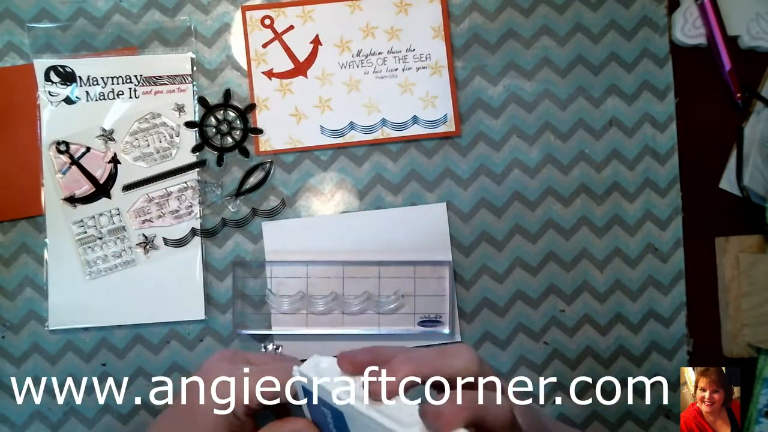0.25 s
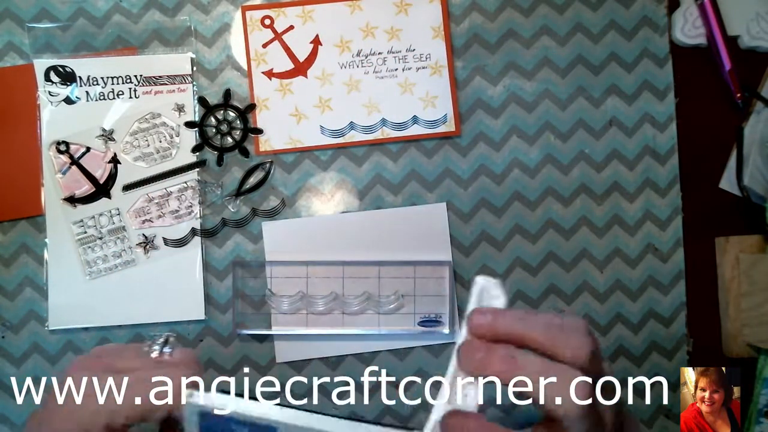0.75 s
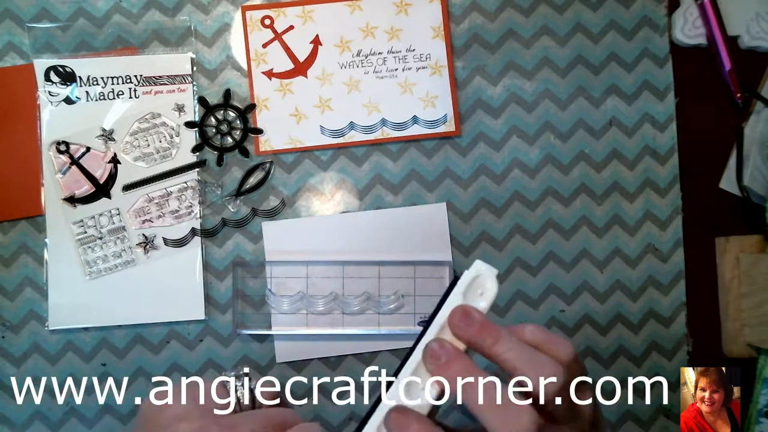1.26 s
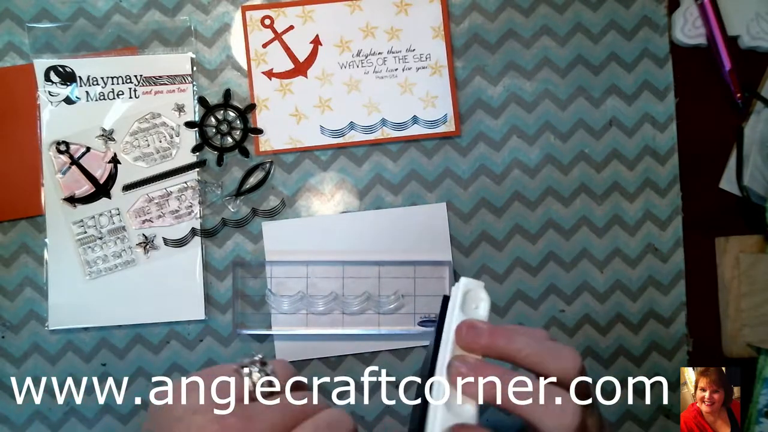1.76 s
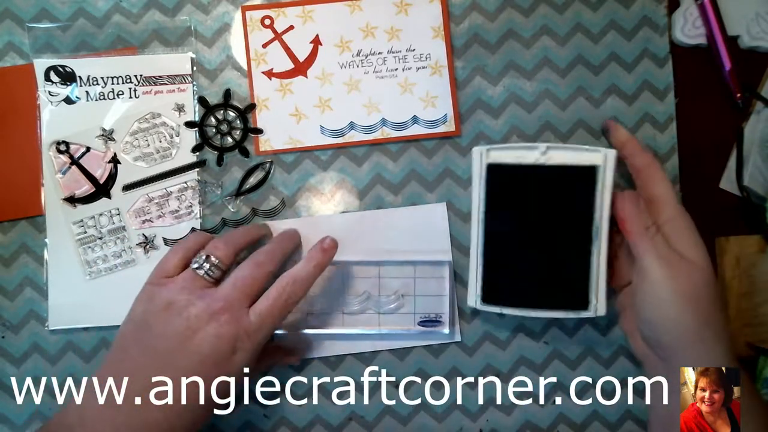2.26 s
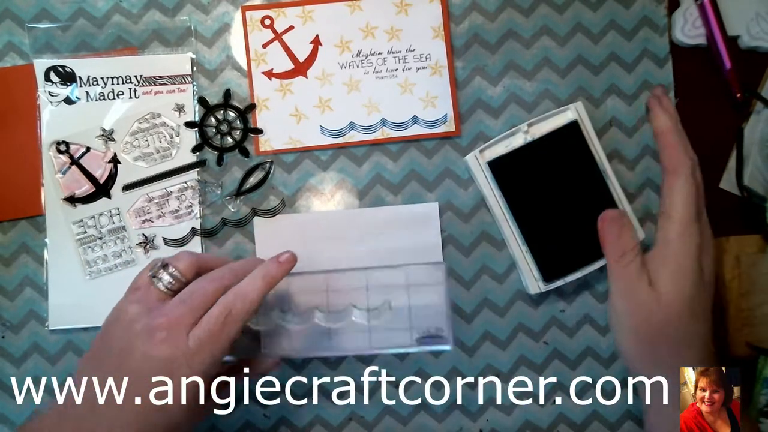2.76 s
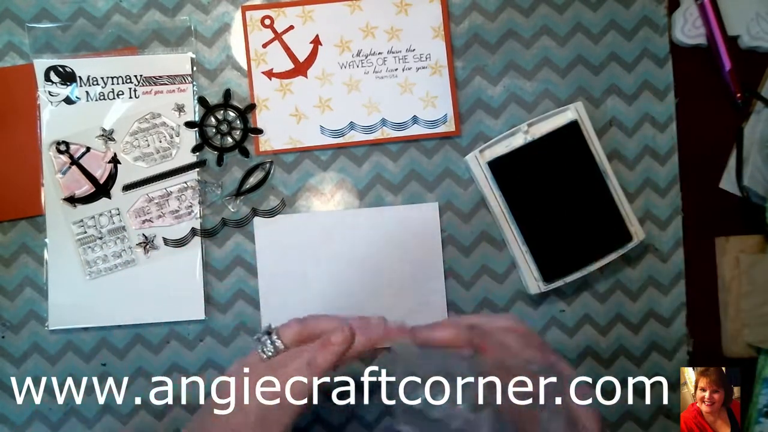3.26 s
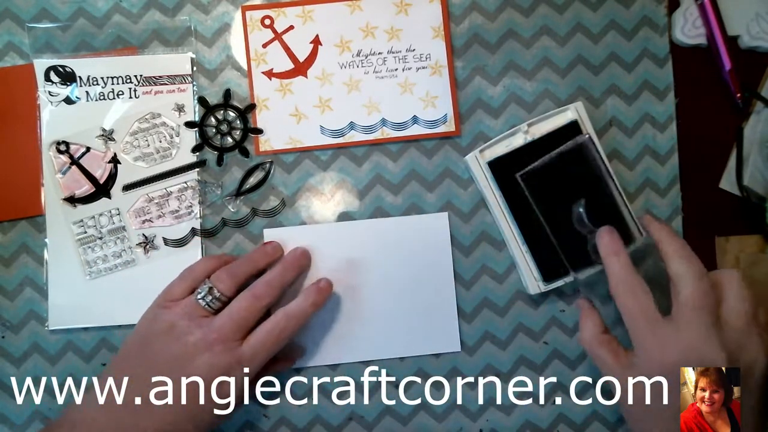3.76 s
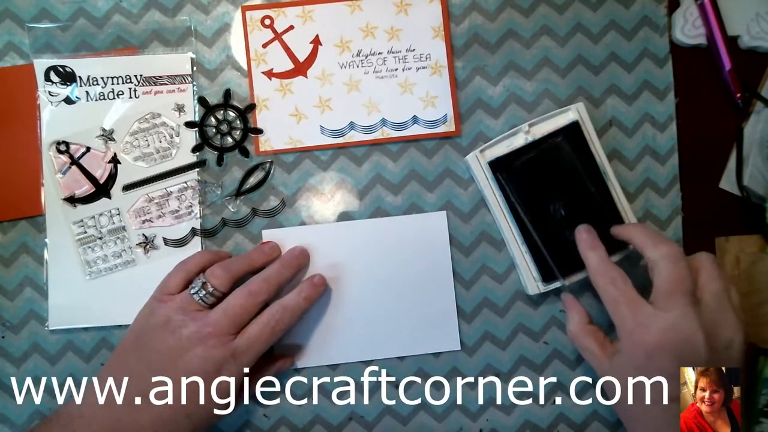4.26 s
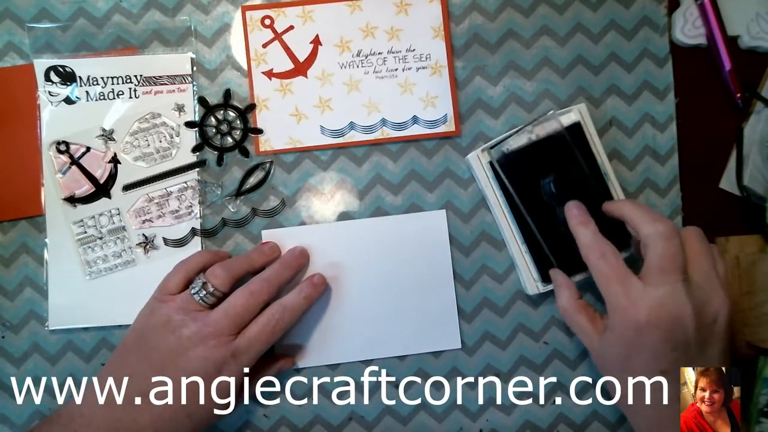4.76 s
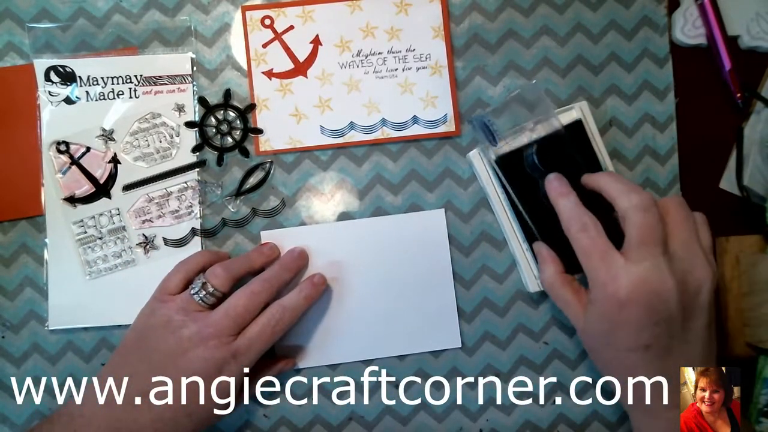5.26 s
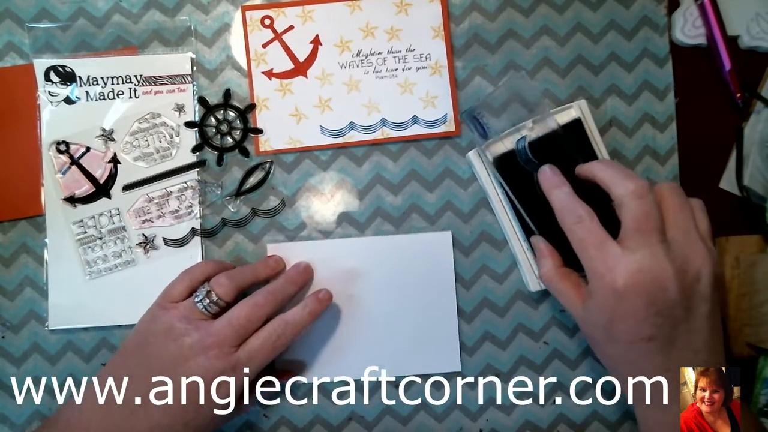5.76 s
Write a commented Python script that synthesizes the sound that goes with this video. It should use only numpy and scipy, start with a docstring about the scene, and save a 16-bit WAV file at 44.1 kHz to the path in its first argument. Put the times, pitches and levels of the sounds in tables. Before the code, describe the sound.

Close, dry desktop sounds over quiet fan-like hum: faint clicks and fingertip scuffs, a short plastic slide into a stop, then a bright sharp lid snap. Knocks follow as the hollow case is set down, ending in the loudest crack and a rapid bounce. After a quieter gap with tiny squeaks, a stamp block taps the pad's rim lightly, with soft squashes and low hand bumps.

```python
"""Over a faint wavering hum, fingers flick at a hard plastic ink pad case and its lid slides and snaps round.
The case then clatters down on a desk and bounces to rest; fingers brush and squeak on it.
Last, a stamp on an acrylic block is dabbed on the pad and clicks against the rim.
Knocks are fading tones plus cracks of noise; rubbing is filtered noise; soft bumps are low tones.
A small, dry room adds short echoes, and one nearby microphone hears it all."""
import sys
import numpy as np
from scipy import signal
from scipy.fft import rfft, irfft, next_fast_len
from scipy.io import wavfile
from scipy.ndimage import uniform_filter1d

SR = 44100
rng = np.random.default_rng(int(sys.argv[2]) if len(sys.argv) > 2 else 0)


def wav_out(sig):
    """Save sig, one row per channel (or a flat mono array), as 16-bit PCM at SR to the path in sys.argv[1]."""
    wavfile.write(sys.argv[1], SR, np.round(np.clip(np.atleast_2d(sig).T, -1, 1) * 32767).astype(np.int16))


N = 265437  # length of the scene in samples
T = np.arange(N) / SR  # time in the scene, seconds
AGE = T[:SR // 3]  # time since a short sound began, seconds


def amp(db):
    """Turn decibels into a gain."""
    return 10 ** (np.asarray(db) / 20)


def unit(x):
    """Scale to rms 1."""
    return x / np.sqrt(np.mean(x ** 2))


def burst(x):
    """Scale a short sound to the energy of 5 ms at rms 1."""
    return x / np.sqrt(np.sum(x ** 2) / (.005 * SR))


def add(track, start_s, sound):
    """Mix a sound into the track at its start time."""
    i = max(int(start_s * SR), 0)
    track[i:i + len(sound)] += sound[:N - i]


def lowpass(x, hz):
    """Take away the treble above a cut-off (second order)."""
    sos = signal.butter(2, min(hz, SR / 2 - 1000), fs=SR, output="sos")
    return signal.sosfilt(sos, x)


def highpass(x, hz, order):
    """Take away the bass below a cut-off."""
    return signal.sosfilt(signal.butter(order, hz, "high", fs=SR, output="sos"), x)


def colour(x, points):
    """Shape the tone through (pitch_hz, level_db) points, with no sound ahead of its cause."""
    size = next_fast_len(len(x) + 2048, True)
    hz, db = np.transpose(points)
    log_hz = np.log(np.fft.rfftfreq(size, 1 / SR) + 1)
    log_gain = np.log(amp(np.interp(log_hz, np.log(hz), db)))
    # folding the cepstrum forward in time makes the filter causal
    cepstrum = irfft(log_gain, size)
    cepstrum[1:size // 2] *= 2
    cepstrum[size // 2 + 1:] = 0
    response = np.exp(rfft(cepstrum))
    return irfft(rfft(x, size) * response, size)[:len(x)]


def fade(t60):
    """Die away smoothly, by 60 dB in t60 seconds."""
    return np.exp(-np.log(1000) * AGE / t60)


def swell(length_s):
    """A soft push that peaks at 1 after half its length and dies away."""
    u = 2 * AGE / length_s
    return u * np.exp(1 - u)


def walk(rate_hz):
    """Slow chance with spread 1: held random levels, smoothed twice."""
    k = int(SR / rate_hz)
    held = np.repeat(rng.standard_normal(N // k + 1), k)
    return unit(uniform_filter1d(uniform_filter1d(held, k), k)[:N])


# tone of the echoes: pitch_hz, level_db
ECHO_COLOUR = [(100, -4), (400, -3.5), (1000, -5), (2700, -8.5), (6000, -7), (10000, -4.5), (15000, -3)]


def room(x, wet_db, low_t60=0.13, high_t60=0.074, split_hz=4500, build_s=.02):
    """Echoes from the desk and near walls build up in milliseconds; the treble dies first."""
    noise = rng.standard_normal(len(AGE))
    low = signal.sosfiltfilt(signal.butter(2, split_hz, fs=SR, output="sos"), noise)
    high = noise - low
    tail = (low * fade(low_t60) + high * fade(high_t60)) * (1 - fade(build_s)) ** 2
    tail = colour(tail / np.sqrt(np.sum(tail ** 2)), ECHO_COLOUR)
    return x + amp(wet_db) * signal.fftconvolve(x, tail)[:len(x)]


# tones of the hum: pitch_hz, level_db (rms)
HUM_TONES = [(108.3, -56), (303, -68), (409, -71.5), (486, -72), (612, -71)]
# tone of the room air: pitch_hz, level_db
AIR_COLOUR = [(20, -14), (40, -10.5), (60, -13), (80, -15), (100, -6), (145, -1), (190, -6.5), (300, -10.5),
              (400, -14.5), (620, -10.5), (950, -14), (1600, -24.5), (5000, -39), (16000, -52.5)]
AIR_DB = -56.5


def background(waver_hz=1.7, flutter_db=1.5, drift_db=.5):
    """A hum, as of a small fan, wavers in pitch and level over the noise of the room air."""
    hum = np.zeros(N)
    for pitch_hz, level_db in HUM_TONES:
        level = amp(level_db + flutter_db * walk(15))
        phase = 2 * np.pi * np.cumsum(pitch_hz + waver_hz * walk(10)) / SR
        hum += level * np.sqrt(2) * np.sin(phase)
    air = unit(colour(rng.standard_normal(N), AIR_COLOUR))
    return hum + amp(AIR_DB + drift_db * walk(1.3)) * air


# soft bumps on the desk, mostly from hands; the last follows the stamp's tap at 5.765 s: start_s, level_db,
# pitch_hz
DESK_BUMPS = [(1.262, -53, 305), (1.523, -52.5, 135), (3.625, -57, 272), (3.805, -55.5, 135),
              (4.675, -54.5, 159.6), (3.96, -50, 120.9), (5.782, -51, 291.8)]
BUMP_S = .021


def desk_bumps():
    """A soft push on the desk is heard as one low tone that swells and dies."""
    out = np.zeros(N)
    for start_s, level_db, pitch_hz in DESK_BUMPS:
        tone = np.sqrt(2) * np.sin(2 * np.pi * pitch_hz * AGE)
        add(out, start_s, amp(level_db) * tone * swell(BUMP_S))
    return out


def rubs(events, resonances):
    """Short swells of friction noise pass through the resonances of what is rubbed."""
    out = np.zeros(N)
    for start_s, level_db, length_s in events:
        for pitch_hz, width_hz, share_db in resonances:
            b, a = signal.iirpeak(pitch_hz, pitch_hz / width_hz, fs=SR)
            noise = rng.standard_normal(len(AGE))
            grit = signal.lfilter(b, a, signal.lfilter(b, a, noise))
            add(out, start_s, amp(level_db + share_db) * unit(grit) * swell(length_s))
    return out


# fingertips flick and brush over the case: start_s, level_db, length_s
FINGER_RUBS = [(.615, -72, .007), (.634, -65.5, .005), (.704, -71, .01), (.777, -70, .007),
               (1.25, -70.5, .007), (1.609, -67.5, .008), (1.96, -78.5, .06), (3.261, -80, .014)]
# resonances of rubbing skin: pitch_hz, width_hz, level_db
SKIN_RESONANCES = [(9070, 6300, -0.5), (2435, 2400, -5.5)]


def skin_rubs():
    """Fingertips scuff the case with a wide, mostly high rush of noise."""
    return rubs(FINGER_RUBS, SKIN_RESONANCES)


# fingers squeak on plastic: start_s, level_db, length_s
FINGER_SQUEAKS = [(2.355, -69, .03), (2.42, -61.5, 0.024), (3.309, -63.5, 0.016), (3.342, -59.5, 0.00574)]
# resonances of a squeak: pitch_hz, width_hz, level_db
SQUEAK_RESONANCES = [(3100, 510, -0.5), (1350, 400, -2.5)]


def squeaks():
    """Fingers squeak on plastic: friction noise gathers in two narrower bands."""
    return rubs(FINGER_SQUEAKS, SQUEAK_RESONANCES)


# the stamp squashes the pad: start_s, level_db, length_s
STAMP_PRESSES = [(4.143, -41.5, .011), (4.243, -46.5, .012), (4.618, -49, .022), (4.683, -46, .014),
                 (4.762, -50, .016)]
# resonances of the squashed pad: pitch_hz, width_hz, level_db
PAD_RESONANCES = [(707, 230, -1), (1200, 900, -13)]


def pad_presses():
    """The soft pad gives way under the stamp with a short, dull swell of noise."""
    return rubs(STAMP_PRESSES, PAD_RESONANCES)


SLIDE_EDGE_S = .008  # how long the slide takes to start, break free or stop


def onset(start_s):
    """Rise from 0 to 1 around a moment."""
    return np.clip((T - start_s) / SLIDE_EDGE_S + .5, 0, 1)


# tone of the lid on its rails: pitch_hz, level_db
RAIL_COLOUR = [(290, -58), (500, -48), (807, -34.5), (855, -14), (1180, 0), (1640, -14), (3920, -1.5),
               (4340, -12), (5020, -3), (6230, -18.5), (7100, -12.5), (11000, -18.5), (16000, -30)]
# the lid creeps along its rails, breaks free and speeds up until it meets the stop
CREEP_S, FREE_S, STOP_S = .778, .827, .908
CREEP_DB, FREE_DB, SPEED_UP_DB_PER_S = -66.5, -51, 25.5


def slide(slips_per_s=2500, catches_per_s=130, hiss=0.97):
    """Plastic rubs on plastic: dense slips over a fine hiss, with a few coarser catches."""
    slips = (rng.random(N) < slips_per_s / SR) * rng.standard_normal(N)
    catches = (rng.random(N) < catches_per_s / SR) * rng.uniform(-1, 1, N)
    push = unit(slips) + hiss * rng.standard_normal(N) + .5 * unit(catches)
    level_db = CREEP_DB + (FREE_DB - CREEP_DB) * onset(FREE_S)
    level_db += SPEED_UP_DB_PER_S * (np.clip(T, FREE_S, STOP_S) - FREE_S)
    judder_db = 1.8 * walk(120)
    moving = onset(CREEP_S) * (1 - onset(STOP_S))
    return unit(colour(push, RAIL_COLOUR)) * amp(level_db + judder_db) * moving


def ring(modes):
    """A struck part sounds several fading tones, every other one starting downwards."""
    out = np.zeros(len(AGE))
    for k, (pitch_hz, level_db, t60_s) in enumerate(modes):
        out += (-1) ** k * amp(level_db) * fade(t60_s) * np.sin(2 * np.pi * pitch_hz * AGE)
    return burst(out)


def radiate(x, contact_hz, size_hz=450):
    """A softer contact leaves the high tones still, and a small part gives out little bass."""
    return highpass(lowpass(x, contact_hz), size_hz, 2)


# tones of the air in the hollow case: pitch_hz, level_db, t60_s (time to fade by 60 dB)
HOLLOW_MODES = [(490, -16, .04), (672, 0, .042), (815, -10, .035)]
# tones of the desk top: pitch_hz, level_db, t60_s
DESK_MODES = [(115, -6, 0.11), (169, -3.5, 0.076), (240.4, -5.5, .05), (316, -1, 0.078), (377, -2.5, 0.12)]
PING_T60 = .022  # how long the struck spot rings, seconds


def strikes(events, modes, crack_colour, crack_db, crack_t60, wet_db, ping_db, thud_db):
    """Each contact cracks and rings the part, and sounds the hollow case and the desk under it."""
    out = np.zeros(N)
    hollow = ring(HOLLOW_MODES)
    desk = burst(ring(DESK_MODES) * (1 - fade(0.035)))  # the heavy top takes time to move
    for start_s, level_db, contact_hz, ping_hz, hollow_db in events:
        noise = rng.standard_normal(len(AGE)) * fade(crack_t60)
        crack = burst(colour(noise, crack_colour))
        part = burst(radiate(ring(modes) + amp(crack_db) * crack, contact_hz))
        # the wall flexes where it is hit
        ping = burst(radiate(ring([(ping_hz, 0, PING_T60)]), contact_hz))
        # the part moves between contacts, so each one meets its own pattern of echoes
        knock = room(part, wet_db) + amp(ping_db) * ping
        knock += amp(hollow_db) * hollow + amp(thud_db) * desk
        add(out, start_s, amp(level_db) * knock)
    return out


def with_hollow(events, hollow_db):
    """Let all contacts sound the hollow of the case equally."""
    return [(*row, hollow_db) for row in events]


# the stamp block touches the rim: start_s, level_db, contact_cutoff_hz, ping_hz
RIM_TAPS = [(4.1412, -36.5, 8140, 3190), (4.3845, -41, 5032, 2660), (4.6815, -41, 3200, 3250),
            (4.7592, -48.5, 2520, 2740), (5.765, -37.5, 3950, 2660)]
# tones of the block: pitch_hz, level_db, t60_s
BLOCK_MODES = [(977, -4, 0.057), (1217, -9.5, 0.033), (1610, -1, 0.016), (1813, -14, 0.035),
               (2667, 3, 0.02), (2872, -10, 0.021), (3160, -3.5, 0.018), (3417, -11.5, 0.019),
               (4160, -1.5, 0.013), (5210, 4.5, 0.0074)]
# the crowd of quickly dying tones in its crack: pitch_hz, level_db
BLOCK_CRACK_COLOUR = [(200, -6), (700, 1.5), (1500, -0.5), (3000, 4.5), (5000, -9.5), (7000, -21.5),
                      (10000, -17.5), (15000, -83)]


def stamp():
    """The acrylic block clicks on the rim with short tones and a strong crack."""
    return strikes(with_hollow(RIM_TAPS, hollow_db=-12), BLOCK_MODES, BLOCK_CRACK_COLOUR,
                   crack_db=4, crack_t60=0.038, wet_db=-4.5, ping_db=-8, thud_db=-16)


# after the last knock the case bounces to rest
BOUNCES = 4
FLIGHT_S, FLIGHT_RATIO = .028, 0.68  # first flight, and each flight against the one before
BOUNCE_LOSS_DB, SETTLE_LOSS_RATIO = -12, .75  # each landing loses fewer dB than the one before
BOUNCE_DULLING = .62  # contact cut-off and ping against the landing before
FAR_EDGE_S, FAR_EDGE_DB = .0055, -4.5  # the far edge lands just after the near one, more weakly


def bounces(knock):
    """The landings after a drop, near edge then far edge, come ever closer, weaker and duller."""
    start_s, level_db, contact_hz, ping_hz, hollow_db = knock
    landings = []
    for k in range(BOUNCES):
        shrink = FLIGHT_RATIO ** k
        start_s += FLIGHT_S * shrink
        level_db += BOUNCE_LOSS_DB * SETTLE_LOSS_RATIO ** k
        contact_hz *= BOUNCE_DULLING
        ping_hz *= BOUNCE_DULLING
        far_s, far_db = start_s + FAR_EDGE_S * shrink, level_db + FAR_EDGE_DB
        landings.append((start_s, level_db, contact_hz, ping_hz, hollow_db))
        landings.append((far_s, far_db, contact_hz, ping_hz, hollow_db))
    return landings


# the case is set down corner by corner; the flatter it lands, the more its hollow sounds:
# start_s, level_db, contact_cutoff_hz, ping_hz, hollow_db
SET_DOWN_KNOCKS = [(2.0797, -18.5, 6000, 2900, -27), (2.136, -27, 4500, 1620, -18),
                   (2.163, -22.5, 7600, 1105, -6), (2.223, -28, 5560, 3750, -5.5),
                   (2.235, -30, 3760, 1920, -7.5), (2.514, -10, 15940, 4095, -3.5)]
# tones of the case: pitch_hz, level_db, t60_s
CASE_MODES = [(970.5, -14, 0.071), (1218, -8, 0.054), (1330, -9, 0.035), (1830, -13, 0.06),
              (1970, -10.5, .028), (2554, -9, .045), (2650, -8.5, 0.012), (2775, -4.5, 0.026),
              (3110, -6, 0.034), (3235, -9, 0.026), (3680, -7.5, 0.032), (4127, -4, 0.024),
              (4920, -4.5, .018), (6250, -4, 0.008)]
# the crowd of quickly dying tones in its crack: pitch_hz, level_db
CASE_CRACK_COLOUR = [(200, -20), (600, -8.5), (1100, 4.5), (1500, -2.5), (3000, 5.5), (5000, 1), (8000, -8),
                     (10500, -7), (12000, -11.5), (15500, -19)]


def case():
    """The hard case clatters on the desk, ringing its walls and hollow, then bounces to rest."""
    knocks = SET_DOWN_KNOCKS + bounces(SET_DOWN_KNOCKS[-1])
    return strikes(knocks, CASE_MODES, CASE_CRACK_COLOUR,
                   crack_db=1.5, crack_t60=.026, wet_db=-4.5 + .5, ping_db=-6, thud_db=-20)


# the lid leaves its catch and snaps round: start_s, level_db, contact_cutoff_hz, ping_hz
LID_CONTACTS = [(.387, -53.5, 4380, 1623), (.398, -59, 4050, 1610), (.803, -55.5, 7000, 4100),
                (.886, -44.5, 11760, 3920), (.9135, -26.5, 7300, 1617), (1.0055, -49, 5670, 3760),
                (1.0118, -35.5, 3030, 1105), (1.375, -14, 10330, 1134)]
# tones of the lid: pitch_hz, level_db, t60_s
LID_MODES = [(1067, -5.5, 0.03), (1213, 8.5, 0.014), (1270, -11, 0.021), (1554, -7.5, 0.027),
             (1724, -15.5, 0.065), (2490, -22.5, 0.084), (2590, -23, .1), (2726, -9.5, 0.04),
             (3125, -13.5, 0.019), (3760, -18.5, .018), (4420, -15.5, 0.022), (5270, -20.5, 0.032),
             (7300, -11.5, 0.0044), (10210, -13.5, .025)]
# the crowd of quickly dying tones in its crack: pitch_hz, level_db
LID_CRACK_COLOUR = [(40, -42.5), (200, -24), (600, -14.5), (1100, 1), (2000, -1.5), (3200, 1.5),
                    (6000, -10.5), (8500, -5), (11000, -8.5), (15000, -22)]


def lid():
    """The thin lid clicks and snaps, ringing briefly with hardly any hollow or desk in it."""
    return strikes(with_hollow(LID_CONTACTS, hollow_db=-29), LID_MODES, LID_CRACK_COLOUR,
                   crack_db=-0.5, crack_t60=0.022, wet_db=-9, ping_db=-3.5, thud_db=-28)


def scene():
    """Lid, case, stamp and hands sound together in the room."""
    hands = skin_rubs() + squeaks() + pad_presses() + desk_bumps()
    rubbing = room(slide() + hands, wet_db=-7.5)
    return (background() + rubbing + stamp() + case() + lid())[None]


def suppress(x, depth_db=-10, threshold_db=7, size=1024):
    """Noise suppressor: turns down each band near its usual level, so faint tails end early."""
    overlap = size - size // 4
    frames = signal.stft(x, nperseg=size, noverlap=overlap)[2]
    power = uniform_filter1d(np.abs(frames) ** 2, size=7, axis=0) + 1e-30
    usual = np.median(power, axis=1, keepdims=True)
    over = power / usual / amp(threshold_db) ** 2
    gain = amp(depth_db) + (1 - amp(depth_db)) * over ** 2 / (1 + over ** 2)
    return signal.istft(frames * gain, nperseg=size, noverlap=overlap)[1][:N]


# tone of the microphone: pitch_hz, level_db
MIC_COLOUR = [(100, -2.5), (10500, 0.5), (12000, -3.5), (16000, -12.5)]
CEILING = 1.05  # the loudest peaks are rounded towards this level
TOP_HZ = 15800  # nearly nothing is left above this pitch


def record(dry):
    """The microphone rounds peaks and loses deep bass and top; steady noise is then turned down."""
    rounded = CEILING * np.tanh(dry[0] / CEILING)
    thin = colour(highpass(rounded, 55, 4), MIC_COLOUR)
    top_cut = signal.ellip(8, .2, 70, TOP_HZ, fs=SR, output="sos")
    return signal.sosfilt(top_cut, suppress(thin))[None]


dry = scene()
out = record(dry)
wav_out(out)
```